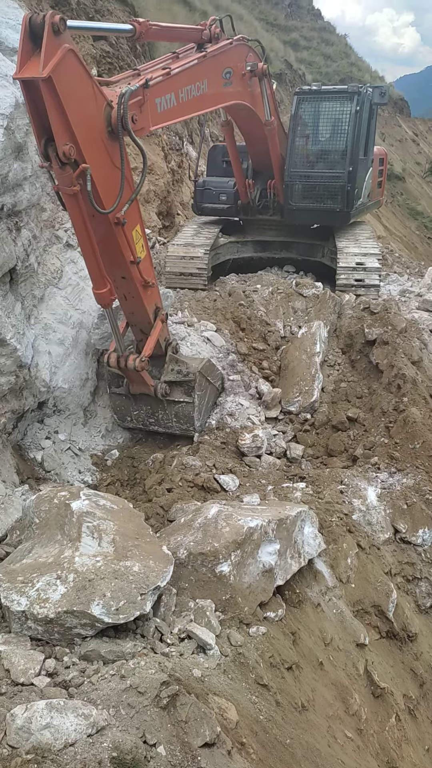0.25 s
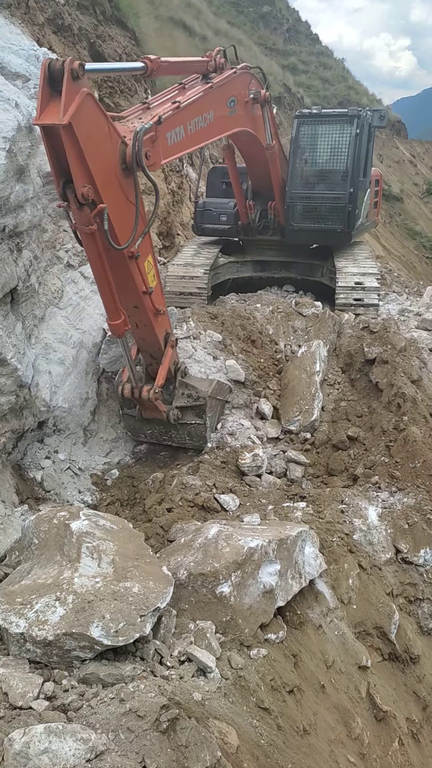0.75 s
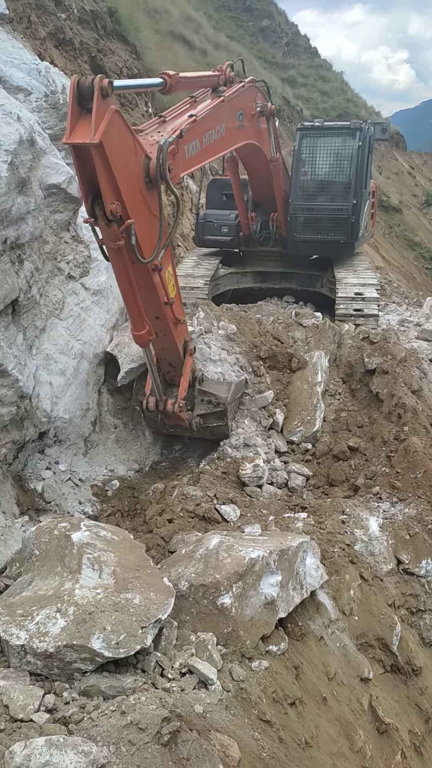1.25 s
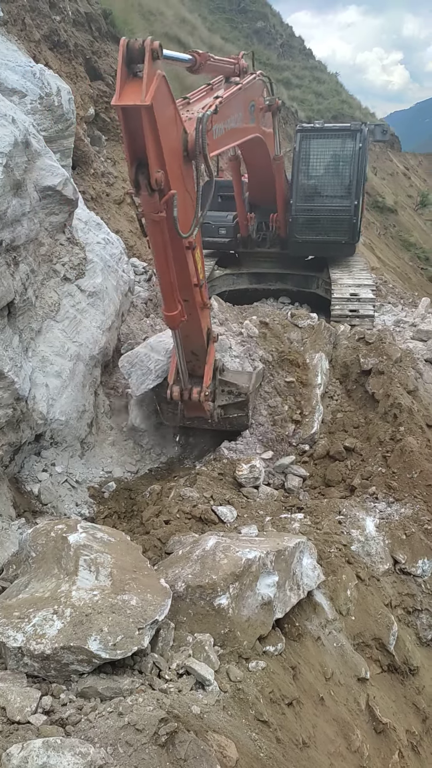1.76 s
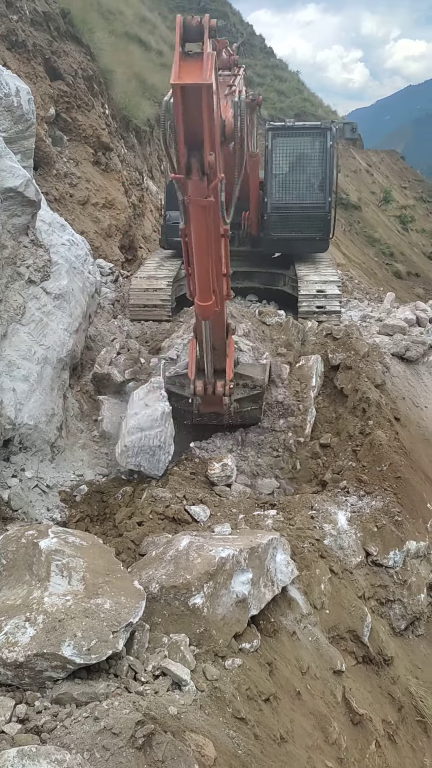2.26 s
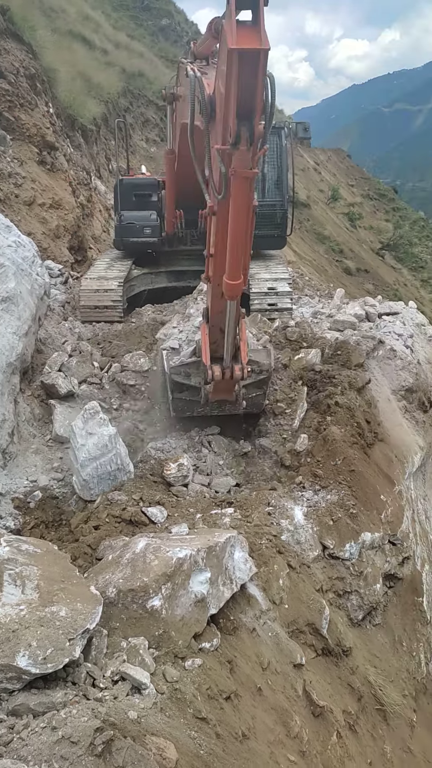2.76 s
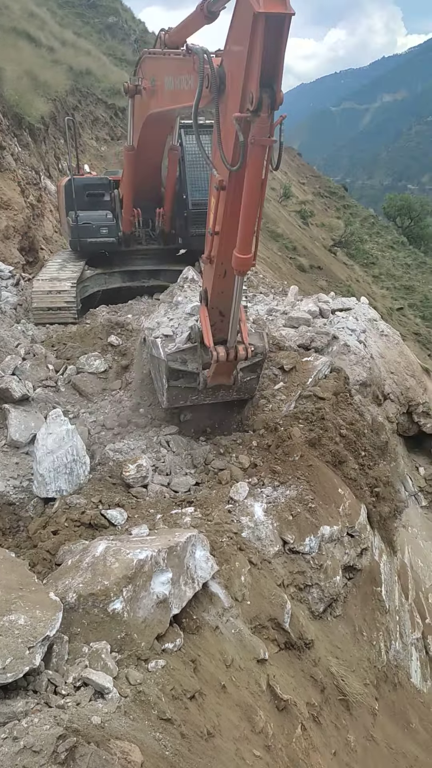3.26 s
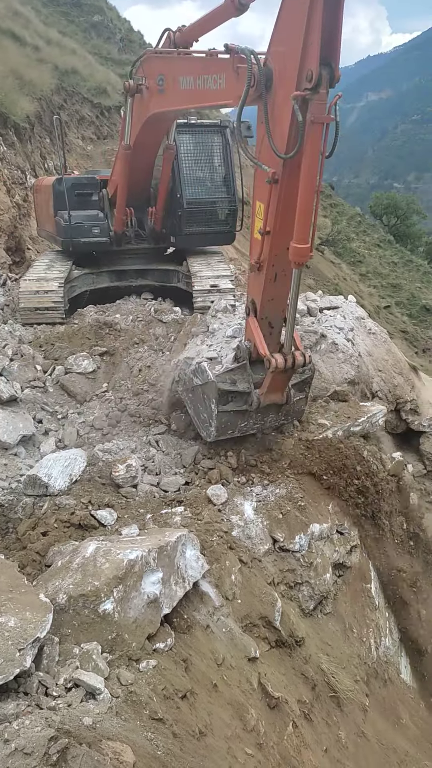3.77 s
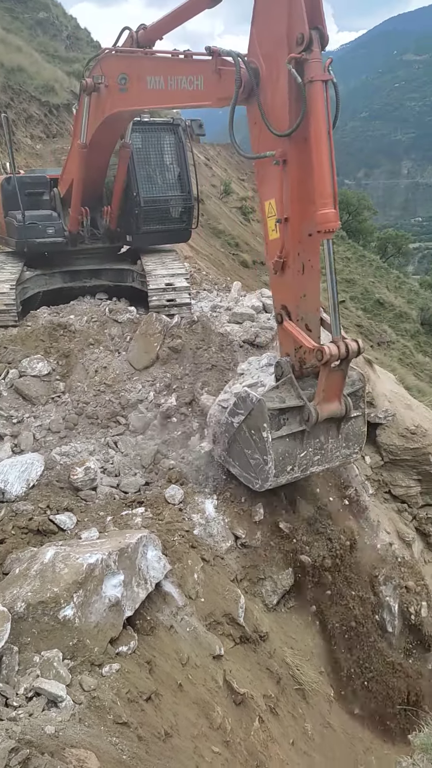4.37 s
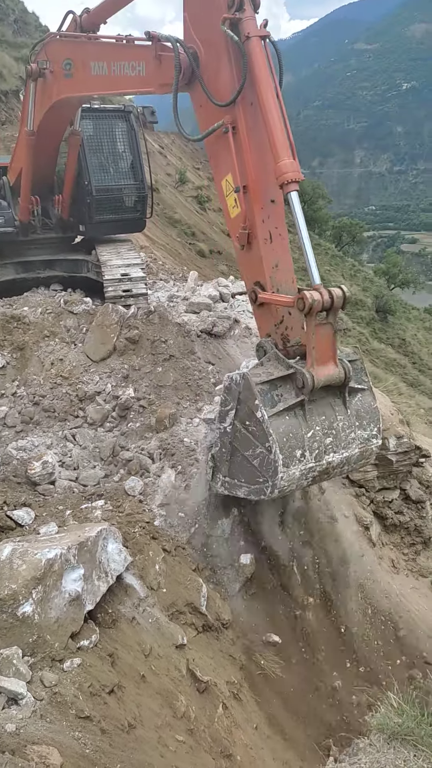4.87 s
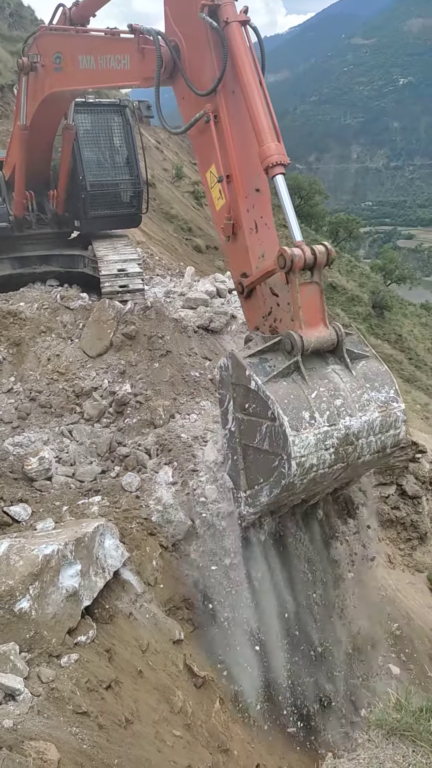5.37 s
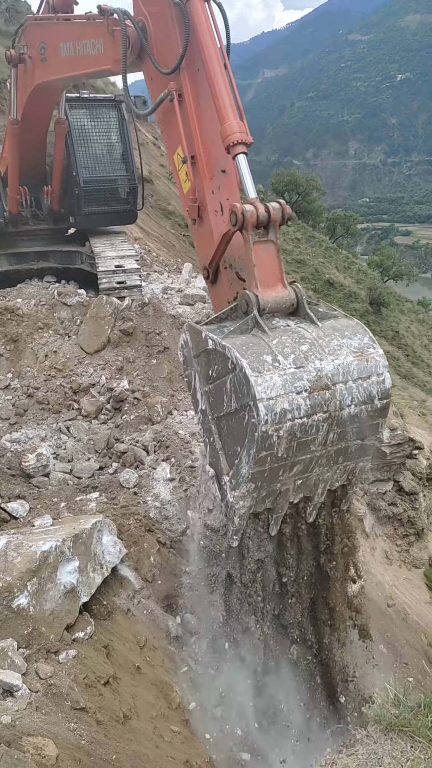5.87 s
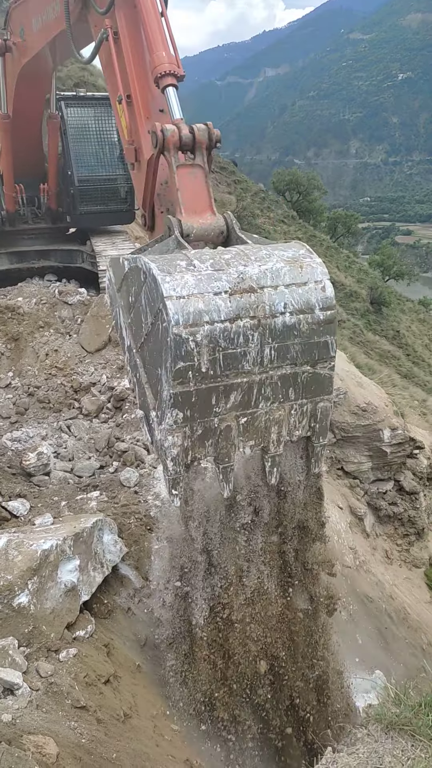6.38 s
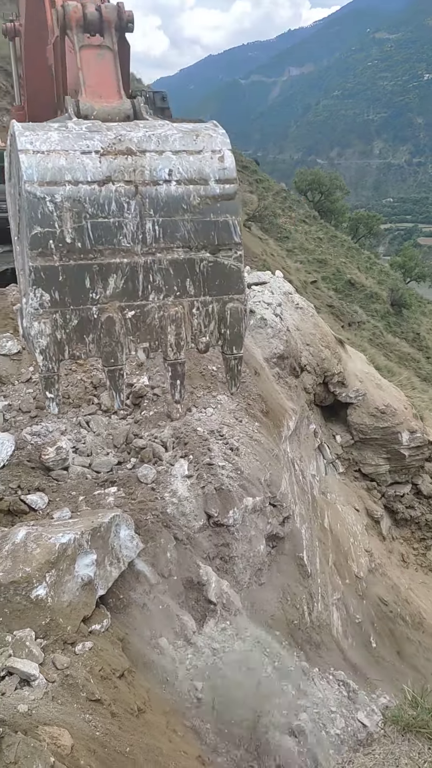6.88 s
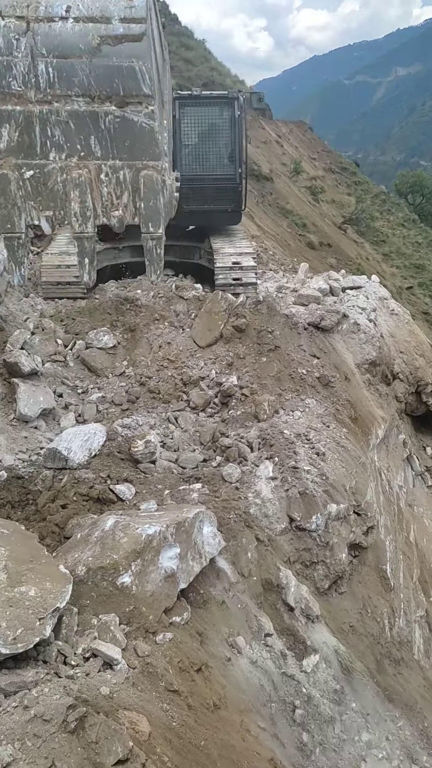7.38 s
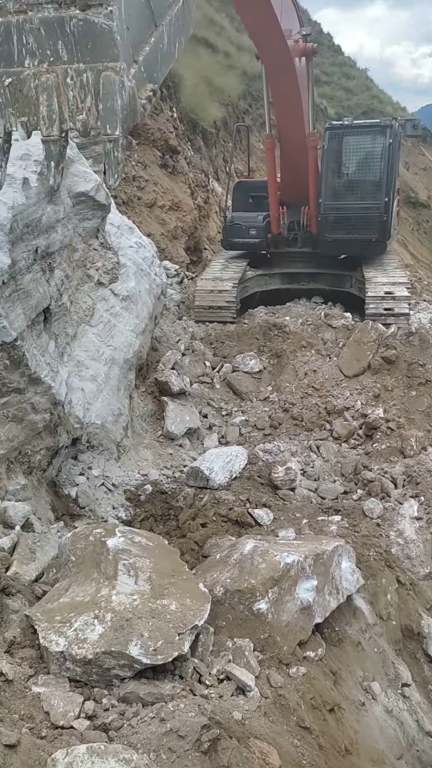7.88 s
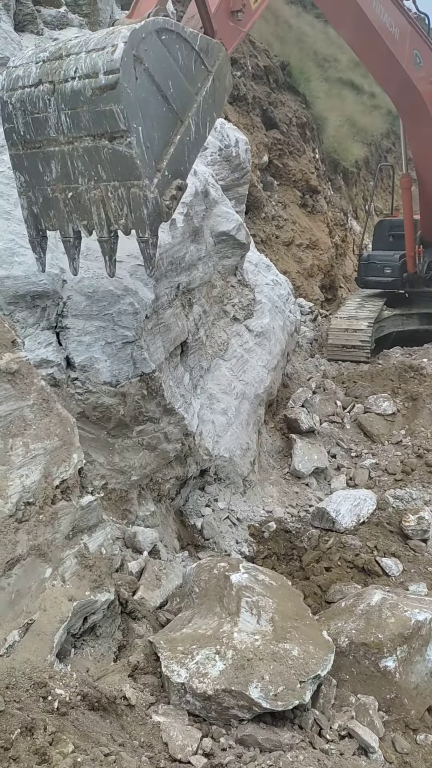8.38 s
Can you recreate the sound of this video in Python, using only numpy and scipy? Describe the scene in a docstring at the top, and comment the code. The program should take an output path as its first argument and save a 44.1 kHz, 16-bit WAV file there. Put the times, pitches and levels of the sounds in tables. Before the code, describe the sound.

Stones thud, clank and pour from a digger's metal bucket over a steady diesel engine and a shifting hydraulic whine.

```python
"""Excavator digging rock

A diesel excavator digs on an open hillside, swings and tips its bucket. The engine drones in firing
tones under a bright hiss; its exhaust roar and casing clatter arrive directly and off the ground.
Pump and gears whine with the engine speed, pins and valves squeak. Rubble slides over the steel,
heavy rocks thud, and stones knock on the bucket and set it ringing."""
import sys
import numpy as np
from scipy import signal
from scipy.fft import rfft, irfft, next_fast_len
from scipy.io import wavfile

SR = 44100
rng = np.random.default_rng(int(sys.argv[2]) if len(sys.argv) > 2 else 0)


def waveform_to_disk(signal):
    """Save audio, clipped to [-1, 1], as 16-bit WAV at the path in sys.argv[1]."""
    frames = np.transpose(np.atleast_2d(signal))
    scaled = np.clip(frames, -1, 1) * 32767
    samples = np.round(scaled).astype(np.int16)
    wavfile.write(sys.argv[1], SR, samples)


N = 380123

# engine speed and two harmonics of the firing tone: time_s, firing_hz, second_db, fourth_db
ENGINE_SPEED = [(0, 78.96, -33, -29), (.6, 80.4, -27, -33.5), (1.25, 80.57, -25, -34),
                (1.9, 79.5, -24.5, -32), (2.4, 79.44, -23.5, -34), (2.7, 79.24, -25, -49),
                (3.4, 79.7, -24, -45.5), (4, 79.98, -27, -34.5), (4.25, 81.34, -26.5, -34.5),
                (4.75, 80.7, -26.5, -29), (5, 81.88, -39, -33.5), (5.25, 81.2, -35, -34),
                (5.6, 80.45, -31.5, -34.5), (6.2, 80.55, -23, -43.5), (6.8, 79.92, -31, -40),
                (7.75, 79.9, -24.5, -41), (8.25, 82.6, -30.5, -31), (8.62, 83.8, -30, -39)]
# engine noise as the load changes: time_s, roar_db, clatter_db, hiss_db
ENGINE_LOAD = [(0, -22.5, -37, -62), (.75, -21, -34.5, -57), (1.15, -22.5, -36.5, -61),
               (1.45, -20.5, -35.5, -58), (2.2, -22.5, -35, -58.5), (2.9, -22, -34.5, -55.5),
               (3.87, -20.5, -30.5, -56.5), (4.6, -20.5, -31, -56), (5.35, -21.5, -31.5, -54.5),
               (5.83, -20.5, -30.5, -50), (6.14, -17.5, -30.5, -54), (6.77, -22, -31, -51.5),
               (6.96, -22, -35, -57), (7.37, -23.5, -36.5, -62), (8.02, -21.5, -35, -59.5),
               (8.62, -19.5, -37.5, -54.5)]


def amp(db):
    """Decibels to gain."""
    return 10 ** (np.asarray(db) / 20)


def rms_one(x):
    """Scale to rms 1."""
    return x / np.sqrt(np.mean(x ** 2) + 1e-20)


def curves(rows):
    """One curve per column after time_s, sample by sample."""
    times, *columns = np.transpose(rows)
    return [np.interp(np.arange(N) / SR, times, column) for column in columns]


def drift(rate_hz):
    """Smooth random wander of rms about 1, mostly slower than rate_hz."""
    hop = 40
    pole = np.exp(-2 * np.pi * hop * rate_hz / SR)
    slow = signal.lfilter([1], [1, -2 * pole, pole * pole], rng.standard_normal(N // hop + 2002))[2000:]
    return np.interp(np.arange(N) / hop, np.arange(len(slow)), rms_one(slow))


def colour(x, spectrum):
    """EQ a signal through rows of freq_hz, gain_db; rms 1."""
    size = next_fast_len(N)
    hz = np.maximum(np.arange(size // 2 + 1) * SR / size, 1)
    freq_hz, gain_db = np.transpose(spectrum)
    gain = amp(np.interp(np.log(hz), np.log(freq_hz), gain_db))
    return rms_one(irfft(rfft(x, size) * gain, size)[:N])


def tone(hz, db, waver_db):
    """A sine on a pitch curve, its rms level wavering around db."""
    level = np.sqrt(2) * amp(db + waver_db * drift(8))
    return level * np.sin(2 * np.pi * np.cumsum(hz) / SR + rng.uniform(0, 2 * np.pi))


def gate(start, end, fade_s):
    """Open from start to end, with a linear fade outside each."""
    return np.interp(np.arange(N) / SR, [start - fade_s, start, end, end + fade_s], [0, 1, 1, 0])


def resonance(x, hz, width_hz):
    """Two-pole peak, gain 1 on top."""
    r = np.exp(-np.pi * width_hz / SR)
    poles = [1, -2 * r * np.cos(2 * np.pi * hz / SR), r * r]
    return signal.lfilter([(1 - r * r) / 2, 0, (r * r - 1) / 2], poles, x)


def narrow_band(noise, hz, width_hz):
    """Noise resonated twice until it has a pitch; rms 1."""
    return rms_one(resonance(resonance(noise, hz, width_hz), hz, width_hz))


def firing_tones(load_db):
    """Cylinder firings drone at four harmonics; the 1st and 8th follow the load."""
    firing_hz, second_db, fourth_db = curves(ENGINE_SPEED)
    harmonics = {1: -30 + 0.46 * load_db, 2: second_db, 4: fourth_db, 8: -50 + 1.5 * load_db}
    return sum(tone(k * firing_hz, db, waver_db=0.9) for k, db in harmonics.items())


def exhaust_roar(level_db):
    """Exhaust gas leaves as low, unsteady noise."""
    # exhaust spectrum: freq_hz, gain_db
    roar_eq = [(15, -57), (25, -32.5), (58, -14.5), (81, -9.5), (113, -14), (146, -10), (172, 1.5),
               (276, -7.5), (379, -8), (430, -11), (520, -15), (680, -50.5), (1140, -120)]
    return amp(level_db + 0.93 * drift(9)) * colour(rng.standard_normal(N), roar_eq)


def casing_clatter(level_db, firing_hz):
    """The casing rattles: midrange noise that throbs lightly with each firing."""
    # casing spectrum: freq_hz, gain_db
    clatter_eq = [(350, -8.5), (500, -3), (650, -1), (900, -6), (1050, -10.5), (1300, -6), (1420, -5),
                  (1600, -10), (1800, -14), (2100, -26.5), (2500, -23), (2900, -32.5), (3700, -40.5),
                  (6000, -79.5)]
    throb = 1 + 0.06 * np.cos(2 * np.pi * np.cumsum(firing_hz) / SR)
    return amp(level_db + 0.6 * drift(25)) * colour(rng.standard_normal(N) * throb, clatter_eq)


def bright_hiss(level_db):
    """Bright, fluttering hiss with a peak at 3.5 kHz and a treble shelf from 5.9 kHz."""
    # hiss spectrum: freq_hz, gain_db
    hiss_eq = [(2500, -36), (3100, 1.5), (3500, 9), (3650, 1.5), (4500, -2.5), (5750, -3), (5950, 3),
               (7600, 2), (9000, -10)]
    return amp(level_db + 1.4 * drift(15)) * colour(rng.standard_normal(N), hiss_eq)


def panel_hum(load_db):
    """One panel of the casing resonates, louder under load."""
    return amp(-51 + load_db) * narrow_band(rng.standard_normal(N), hz=1299, width_hz=28)


def ground_bounce(x, echo_gain=0.58):
    """A short echo from the ground combs the sound; its delay shifts as the machine turns."""
    # lag of the ground path: time_s, delay_ms
    ground_delay = [(0, .97), (3.6, .97), (6.9, 1.017), (7.4, 1.004), (7.9, 0.96), (8.3, 0.86),
                    (8.62, 0.76)]
    lag = curves(ground_delay)[0] * SR / 1000
    echo = np.interp(np.arange(N) - lag, np.arange(N), x)
    return (x + echo_gain * echo) / np.sqrt(1 + echo_gain ** 2)


def hydraulic_whines(firing_hz):
    """The pump and two gears whine at fixed multiples of the firing rate."""
    # main pump, loud while the arm pulls or lifts: time_s, level_db
    pump_level = [(0, -32.5), (.33, -26.5), (.6, -37), (1.2, -36.5), (1.45, -28), (1.95, -23.5),
                  (2.25, -21.5), (2.4, -26), (2.55, -21), (3.3, -28), (3.55, -35.5), (5, -35),
                  (5.65, -44.5), (5.9, -30.5), (6.75, -31.5), (7.25, -22), (7.8, -29.5), (8.1, -26),
                  (8.62, -36.5)]
    # spells of the lower and the higher gear whine: start_s, end_s, level_db
    low_gear = [(1.9, 2.8, -49), (7.1, 8.1, -47.5)]
    high_gear = [(.75, 1.05, -46), (4.084, 4.49, -33), (4.56, 4.7, -39.5), (4.798, 5.035, -32.5),
                 (5.113, 5.18, -35), (8.27, 8.621, -42.5)]
    whines = tone(4.655 * firing_hz, curves(pump_level)[0], waver_db=0.98)
    for order, spells in ((11.32, low_gear), (11.68, high_gear)):
        level = sum(amp(db) * gate(start, end, fade_s=0.05) for start, end, db in spells)
        whines += level * tone(order * firing_hz, db=0, waver_db=1.8)
    return whines


def pin_squeaks():
    """Pins and valves squeak in narrow bands of noise; longer squeaks fade more slowly."""
    # squeaks: start_s, end_s, pitch_hz, width_hz, level_db
    squeaks = [(0.31, 0.45, 1106, 12, -45), (.5, .77, 5250, 200, -71), (1.508, 1.773, 4200, 79, -66),
               (1.558, 1.644, 3890, 50, -66), (1.69, 1.75, 3880, 50, -68), (1.662, 2, 4420, 400, -64),
               (1.67, 1.706, 2310, 38, -45), (1.802, 2.04, 4247, 48, -64.5), (2.276, 2.5, 1284, 30, -39.5),
               (2.62, 3.03, 4230, 69, -67), (2.806, 4.698, 3520, 48, -68.5), (4.666, 4.687, 3427, 36, -51),
               (7.083, 7.094, 1100, 40, -52), (8.488, 8.62, 3897, 40, -63)]
    out, noise = np.zeros(N), rng.standard_normal(N)
    for start, end, hz, width_hz, db in squeaks:
        envelope = gate(start, end, fade_s=0.008 + 0.12 * (end - start))
        out += amp(db + 1.3 * drift(20)) * envelope * narrow_band(noise, hz, width_hz)
    return out


def sliding_rubble(clicks_per_s=1500):
    """Stones roll over steel: dense, uneven clicks that come in clumps."""
    # the slide, strongest while the bucket empties: time_s, level_db
    slide_level = [(0, -47.5), (1.5, -48), (2, -44), (3.4, -47.5), (4.5, -40), (5.6, -43), (5.7, -37),
                   (6.9, -37.5), (7.05, -47.5), (8, -51.5), (8.2, -43.5), (8.62, -42.5)]
    # spectrum of stone on steel: freq_hz, gain_db
    slide_eq = [(300, -25.5), (520, -11), (680, -1.5), (900, -0.5), (1050, -5.5), (1300, -9), (1470, -19.5),
                (1750, -10), (2100, -10.5), (2300, -12), (2700, -18), (3050, -37), (3500, -28),
                (4500, -36.5), (8000, -37.5)]
    sizes = amp(4.2 * np.minimum(rng.exponential(1, N), 4.5)) * rng.choice([-1, 1], N)
    clicks = sizes * (rng.random(N) < clicks_per_s * amp(3 * drift(14)) / SR)
    return amp(curves(slide_level)[0]) * colour(clicks, slide_eq)


def rock_thuds(attack_s=0.0005, t60_s=0.048):
    """Heavy rock lands: a low sine that swells for a moment and is quickly damped."""
    # landings: start_s, level_db, pitch_hz
    landings = [(0.755, -15, 171), (3.652, -8, 175), (4.046, -7.5, 234.4), (4.401, -11.5, 255),
                (5.069, -6.5, 160), (6.17, -6.5, 200.4), (6.503, -8, 197.6)]
    out, t = np.zeros(N), np.arange(SR // 5) / SR
    for start, db, hz in landings:
        envelope = amp(db - 60 * t / t60_s) * (1 - np.exp(-t / attack_s))
        at = round(start * SR)
        out[at:at + len(t)] += envelope * np.sin(2 * np.pi * hz * t)
    return out


def pebbles(count, start_s=5.6, end_s=6.95):
    """Small stones fall at random as the bucket empties: rows of knocks, each an octave wide."""
    when, pitch, softness = rng.random((count, 3)).T
    low_hz = 586 * (1880 / 586) ** pitch
    peak_db = -27 - 0.5 * np.log2(low_hz / 1000) - 18 * softness
    return list(zip(start_s + when * (end_s - start_s), peak_db, low_hz, 2 * low_hz))


def bucket_ring(cracks, boost_db=10):
    """Blows set the modes of the steel bucket ringing."""
    # bucket modes: pitch_hz, relative_db, t60_s
    modes = [(750, -4.5, 0.38), (947, -8.5, 0.4), (1127, -2, 0.072), (1294, -3, 0.3), (1600, -5, 0.3),
             (1642, 0, 0.17), (2220, -8.5, 0.15)]
    ring = sum(amp(db) * resonance(cracks + 1e-18, hz, np.log(1000) / np.pi / t60)
               for hz, db, t60 in modes)
    return amp(boost_db) * ring


def stone_knocks():
    """Each stone hits with a click and a dying crack of noise in its own band, and rings the bucket."""
    # cracks of the loudest stones: start_s, peak_db, low_hz, high_hz
    big_stones = [(1.459, -19.5, 900, 2296), (1.53, -34, 2016, 4000), (1.71, -27, 500, 810),
                  (1.955, -21, 555, 954), (2.22, -32, 1600, 3200), (2.429, -33.5, 1997, 4000),
                  (3.202, -29.5, 1600, 3170), (3.437, -18.5, 448, 2807), (3.45, -26.5, 1008, 4090),
                  (3.6, -29.5, 1600, 3160), (3.7, -23.5, 635, 1008), (3.747, -23, 397, 1008),
                  (3.884, -21.5, 1701, 4360), (3.923, -22, 1250, 3570), (4.045, -9.5, 254, 2200),
                  (4.046, -36, 5800, 7400), (4.052, -14, 760, 1890), (4.06, -21, 800, 5470),
                  (4.072, -19, 400, 3500), (4.3, -30.5, 1500, 2600), (4.4, -18.5, 402.3, 800),
                  (4.649, -25.5, 1600, 3200), (4.666, -20, 1005, 2549), (4.894, -18, 507.1, 810),
                  (5.704, -25, 1270, 3200), (5.797, -22, 1280, 3200), (5.906, -33, 3240, 4800),
                  (5.973, -19.5, 600, 1100), (6.246, -25, 1271, 2538), (6.339, -21, 495, 1800),
                  (6.352, -26.5, 1810, 4480), (6.502, -16.5, 800, 1500), (6.65, -21, 700, 2200),
                  (6.774, -19.5, 610, 1100), (6.832, -28, 1596, 3200), (6.9, -21, 504, 1000),
                  (6.952, -26.5, 1270, 3200), (7.115, -21, 603.4, 2200), (8.165, -27.5, 1008, 3208),
                  (8.178, -27, 1270, 2500)]
    cracks, t = np.zeros(N), np.arange(SR // 5) / SR
    dull = np.exp(-2 * np.pi * 500 / SR)   # stone is duller above 500 Hz
    for start, db, low_hz, high_hz in big_stones + pebbles(count=32):
        t60_s = 0.0075 + 0.025 * np.log2(high_hz / low_hz)   # a broader blow crunches longer
        blow = rng.standard_normal(len(t)) * amp(-60 * t / t60_s)
        blow[0] += 11   # the first hard contact
        band = signal.butter(4, [low_hz, high_hz], "band", fs=SR, output="sos")
        crack = signal.sosfilt(band, signal.lfilter([1], [1, -2 * dull, dull ** 2], blow))
        at = round(start * SR)
        cracks[at:at + len(t)] += amp(db) * crack / np.abs(crack).max()
    return cracks + bucket_ring(cracks)


def scene():
    """The machine and the rock, in mono."""
    firing_hz = curves(ENGINE_SPEED)[0]
    roar_db, clatter_db, hiss_db = curves(ENGINE_LOAD)
    load_db = clatter_db - clatter_db.mean()   # the clatter's swing stands for the load
    engine = firing_tones(load_db)
    engine += ground_bounce(exhaust_roar(roar_db) + casing_clatter(clatter_db, firing_hz))
    engine += bright_hiss(hiss_db) + panel_hum(load_db)
    mix = engine + sliding_rubble() + hydraulic_whines(firing_hz) + pin_squeaks()
    return (mix + rock_thuds() + stone_knocks())[None]


def record(dry):
    """The microphone drops the bass below 45 Hz; the top is cut steeply at 7560 Hz."""
    low_cut = signal.butter(2, 45, "high", fs=SR, output="sos")
    high_cut = signal.ellip(12, 0.5, 60, 7560, fs=SR, output="sos")
    return signal.sosfilt(high_cut, signal.sosfilt(low_cut, dry))


dry = scene()
out = record(dry)
waveform_to_disk(out)
```